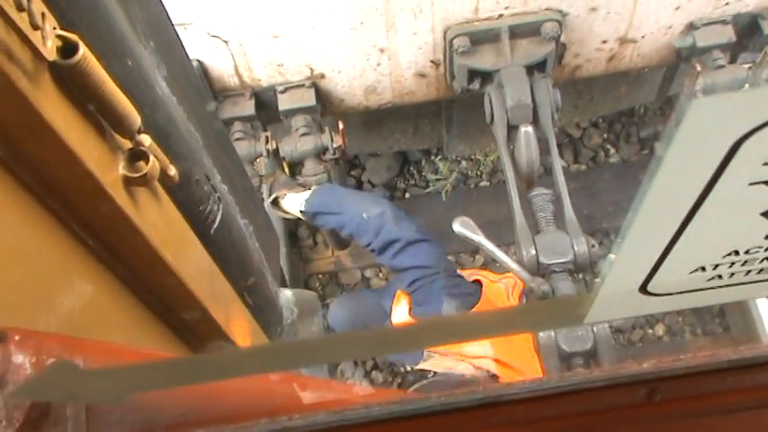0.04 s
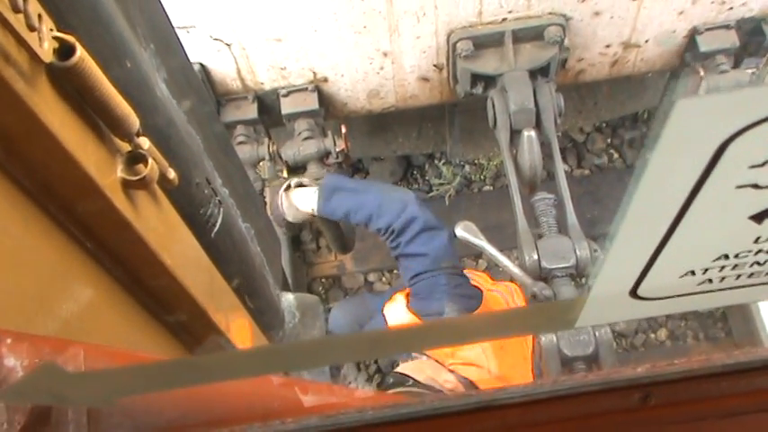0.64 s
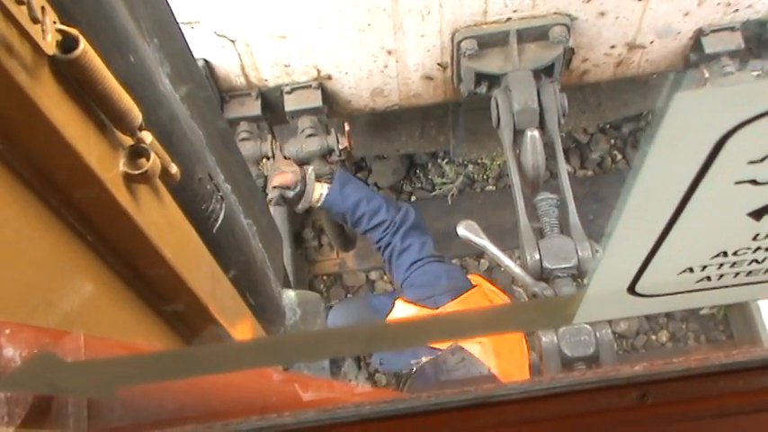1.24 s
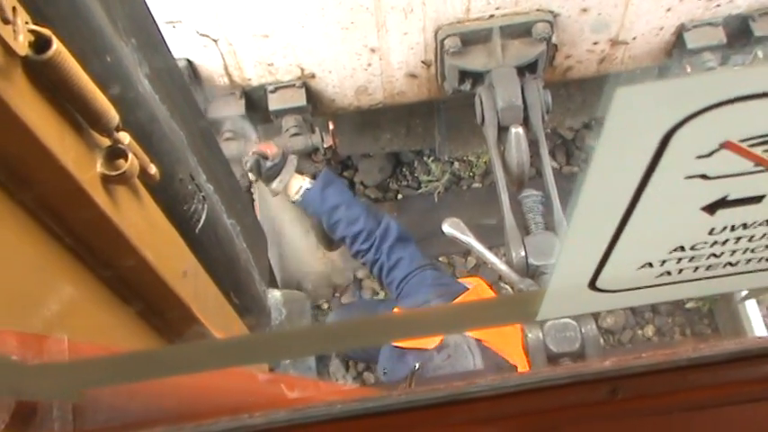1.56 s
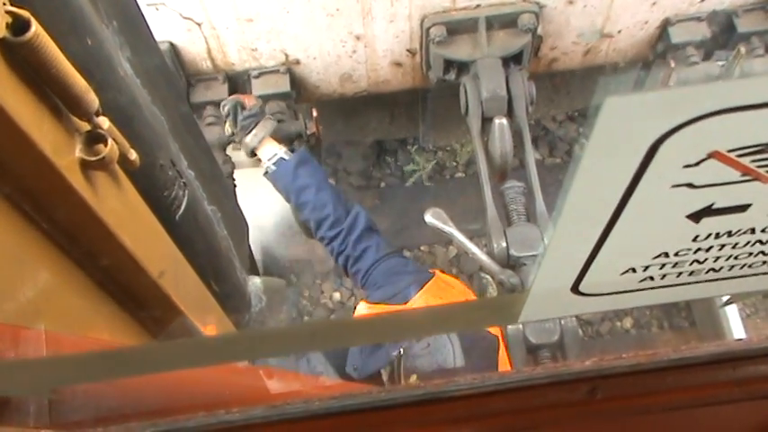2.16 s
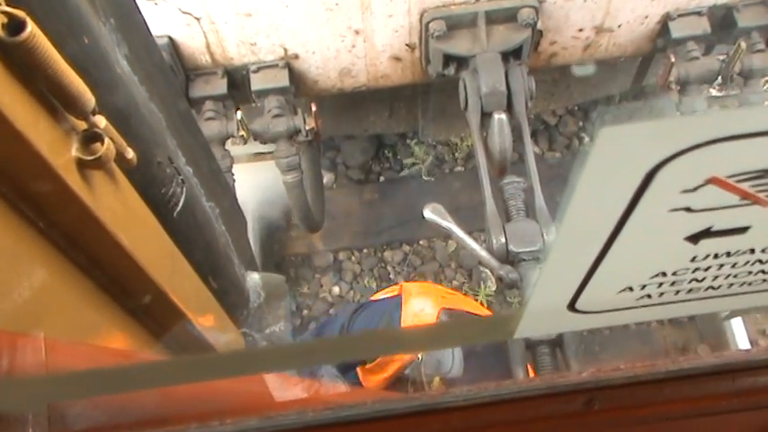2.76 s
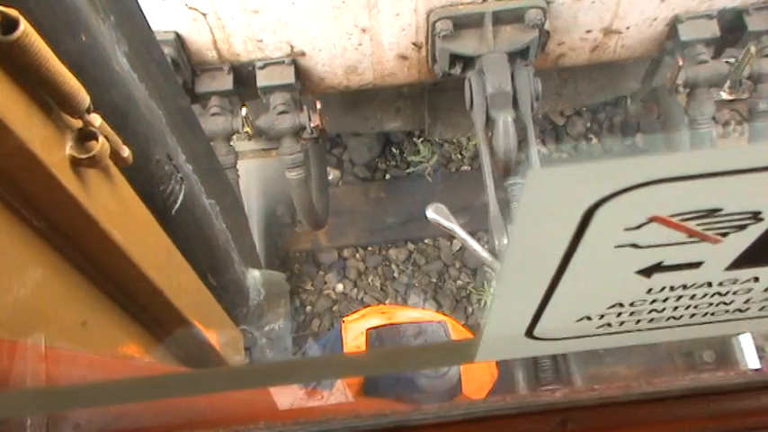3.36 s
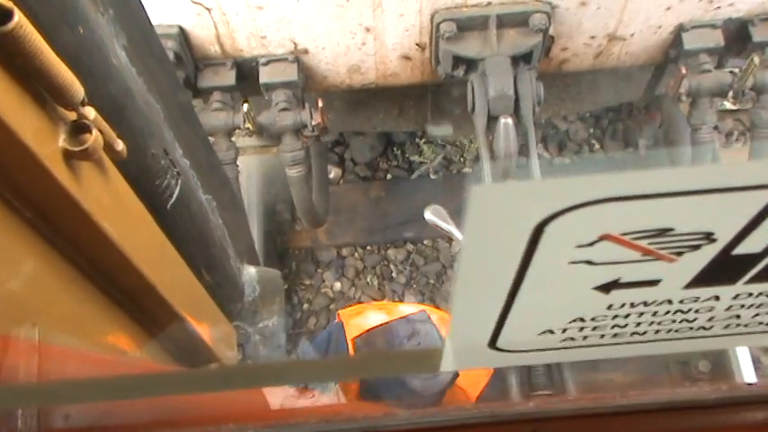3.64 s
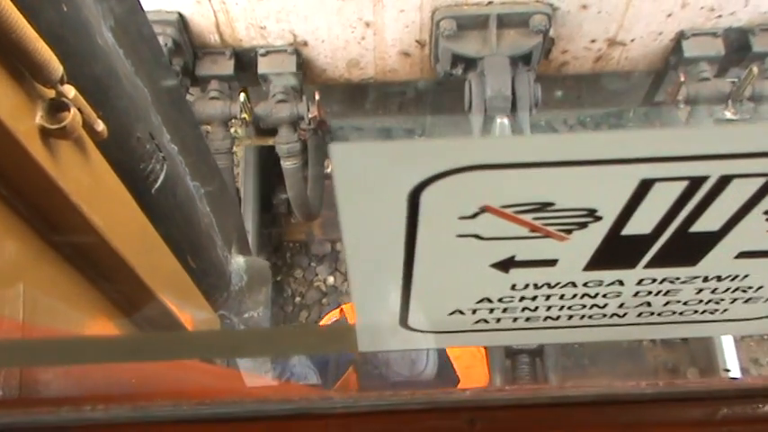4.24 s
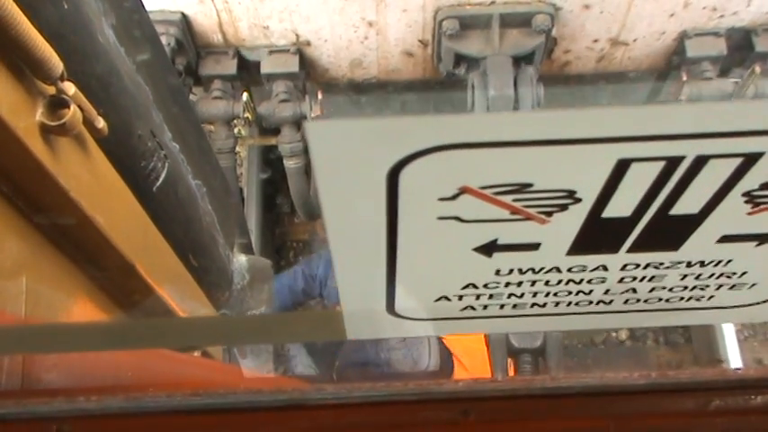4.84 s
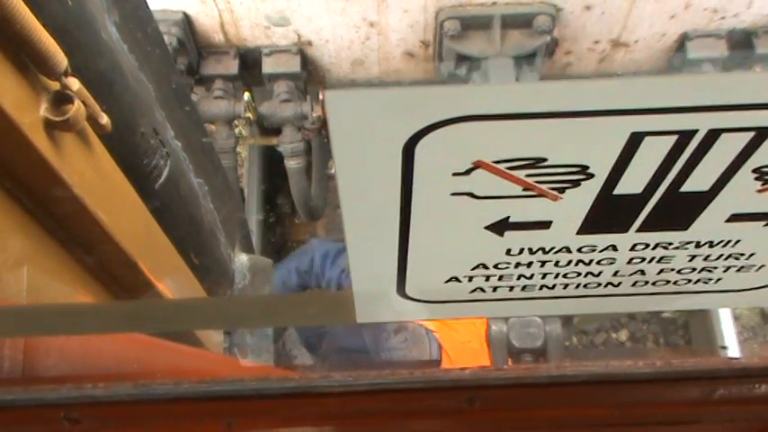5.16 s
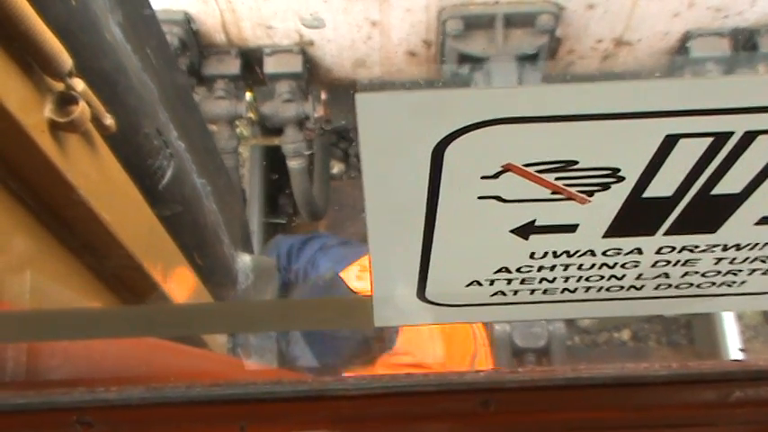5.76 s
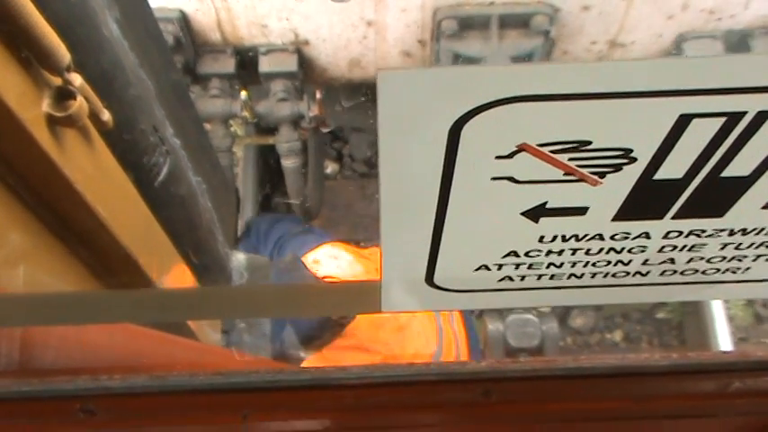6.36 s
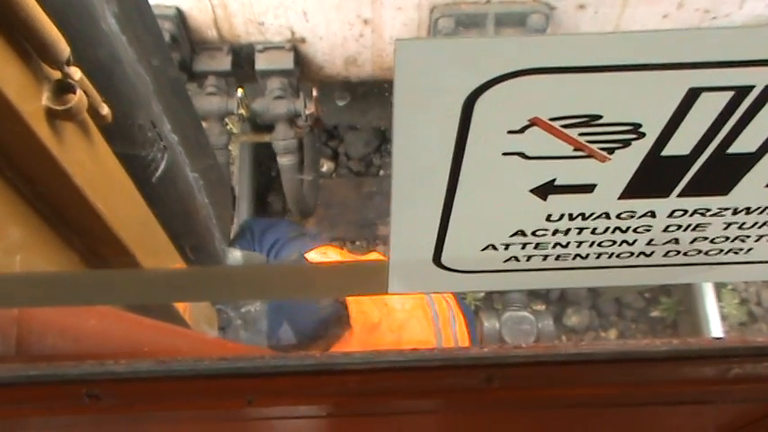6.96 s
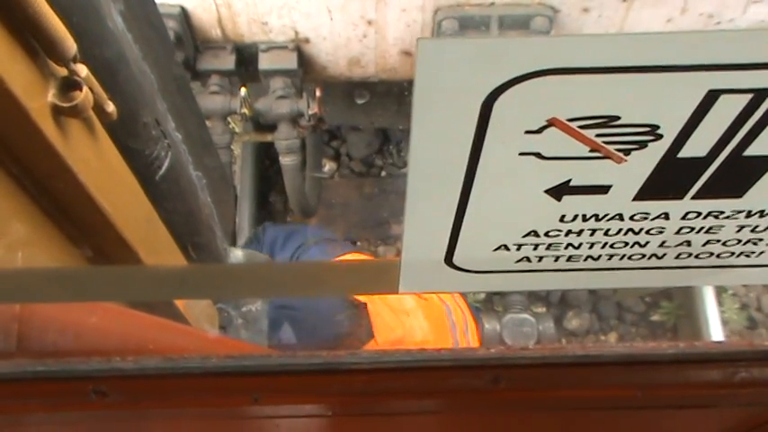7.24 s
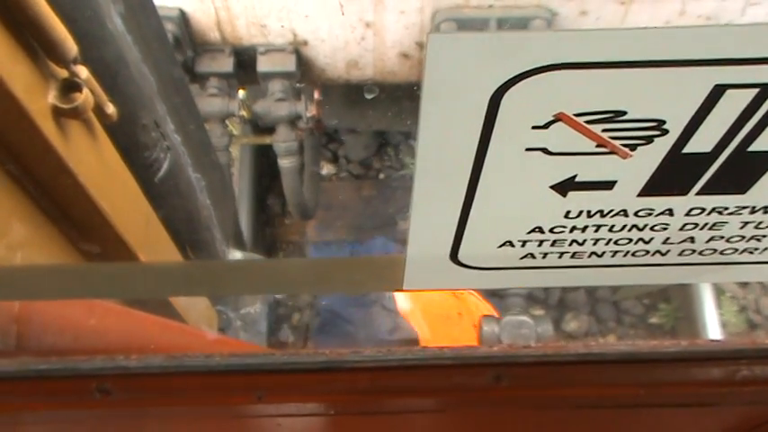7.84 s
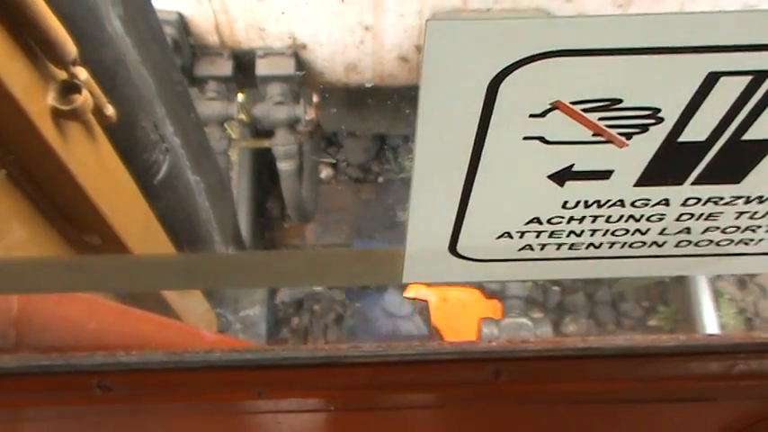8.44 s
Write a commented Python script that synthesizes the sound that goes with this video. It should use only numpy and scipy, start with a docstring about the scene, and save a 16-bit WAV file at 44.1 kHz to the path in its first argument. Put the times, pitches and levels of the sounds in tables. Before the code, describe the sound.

Compressed air spits from a train brake hose, then bursts into a loud hissing roar and dies away over an idling diesel locomotive.

```python
"""Air blasts from the brake pipe between a diesel locomotive and a wagon, heard from the cab above.
As a worker eases the cock open, the jet spits in short bursts, hisses, then roars at full bore until
the pipe is empty; the vehicles and the yard throw it back. The hose couplings wheeze faintly afterwards.
The diesel idles underneath throughout, ducked by gain control when the blast gets loud."""
import sys
import numpy as np
from scipy import signal
from scipy.fft import rfft, irfft, next_fast_len
from scipy.io import wavfile
from scipy.ndimage import uniform_filter1d

SR = 44100
rng = np.random.default_rng(int(sys.argv[2]) if len(sys.argv) > 2 else 0)


def store_pcm(level_fs):
    """Save levels as 16-bit WAV."""
    pcm = np.round(np.clip(level_fs, -1, 1) * 32767).astype(np.int16)
    wavfile.write(sys.argv[1], SR, np.atleast_2d(pcm).T)


N = 383229
TIME = np.arange(N) / SR

# engine automation: t/s, shaft speed/Hz, tone gain/dB, rumble gain/dB
ENGINE_IDLE = [(0, 12.23, -4.5, 4), (1.2, 12.28, 2.7, -2), (3, 12.3, -3.5, -3), (4.6, 12.3, 1.5, -1.3),
               (6.6, 12.24, 0.2, -0.3), (8.69, 12.22, 2.6, 0.1)]
# exhaust partials: multiple of shaft speed, level/dB
EXHAUST_TONES = [(3, -66), (6, -55.5), (12.5, -57), (13, -56.5), (14, -48), (19, -50.5), (20, -56.5),
                 (21, -47.5), (22, -41.5), (23, -40), (24, -43.5), (25, -48), (26, -50)]
# compressor partials: multiple of its own speed, level/dB
COMPRESSOR_TONES = [(2.5, -56.5), (3, -51), (3.5, -52.5), (4, -63), (4.5, -56), (5, -61), (9, -51.5),
                    (11, -48.5), (11.5, -54), (14, -58.5)]
# fan and gear whines: f/Hz, level/dB
FAN_TONES = [(353.5, -52.5), (409, -49), (437, -57), (472, -59)]
# EQ of the engine rumble: f/Hz, level/dB
RUMBLE_EQ = [(12, -88.5), (27, -64), (65, -73), (100, -64), (170, -62.5), (205, -64), (280, -57.5),
             (340, -66.5), (450, -69), (600, -78), (950, -80), (1250, -85.5), (2000, -85), (2700, -94),
             (4000, -102), (6000, -108.5), (9500, -109.5), (15000, -114)]
# the cock cracked open: t/s, length/s, final level/dB, swell on the way/dB, relative seep level/dB
COCK_SPURTS = [(-0.1, 0.12, -41.5, -4, -2), (0.181, 0.13, -26.5, 4.5, -9), (0.52, 0.22, -31, 0.5, -4),
               (0.86, 0.053, -25.5, 11, -2), (0.945, 0.55, -29.5, 2, -14.5)]
# EQ of the hiss at the hose lip: f/Hz, relative level/dB
HISS_EQ = [(150, -32.5), (600, -18), (1000, -15), (1700, -14.5), (2600, -10.5), (3800, -5), (5000, -3),
           (6200, -1), (8400, 0.5), (10000, -4.5), (12000, -11), (15500, -19)]
# ride on the hiss's top octave: t/s, gain/dB
HISS_FIZZ = [(0, -12), (0.25, 1), (1.3, -0.5), (1.7, 8), (1.92, 1.5), (2.25, -0.3), (2.6, 3.5), (4.05, 5.5),
             (4.25, -10)]
# modes of the hose and the gap between the vehicles: f/Hz, width/Hz, boost before scaling/dB
HOSE_MODES = [(351, 25, 10), (510, 28, 3.5), (643, 16, 3.8), (678, 8, 2.5), (758, 14, 6.8), (954, 16, 3.5),
              (1025, 36, 7), (1087, 16, 5), (1236, 24, 6.5), (1348, 20, 6), (1386, 35, 3.5), (1488, 32, 3),
              (1596, 16, 6.5), (1634, 24, 3.5), (1770, 40, 2.5), (2287, 18, 3), (2340, 55, 3),
              (2564, 36, 3.5), (2672, 45, 3.5), (2920, 70, 1.5), (3070, 60, 3), (3473, 24, 5.3),
              (3600, 78, 2.8), (6020, 160, 3.5), (6821, 150, 2), (7170, 60, 3)]
# EQ of the plume's roar: f/Hz, relative level/dB
ROAR_EQ = [(40, -37.5), (140, -23.5), (220, -13.5), (330, -11.5), (550, -5.5), (800, -3.5), (1100, -1),
           (1900, -0.5), (2600, -1.1), (3500, -1), (4300, -4), (6000, -22.5), (12000, -30)]
# the hose mouth half whistles as the flow passes its modes: t/s, half length/s, f/Hz, width/Hz, boost/dB
MOUTH_WHISTLES = [(1.62, 0.17, 6020, 168.3, 4), (1.837, .3, 2532, 45.55, 6), (1.744, 0.07, 998, 110.7, 3.5),
                  (2.242, 0.17, 2500, 264.7, 3.5), (2.303, 0.22, 3060, 122.5, 4.5),
                  (3.3, .15, 6830, 110, 6), (3.5, 0.46, 7300, 45, 6.5)]
# last air through narrow gaps in the couplings: centre t/s, half length/s, f/Hz, width/Hz, level/dB
GAP_WHEEZES = [(4.5, 0.25, 8800, 753, -95), (4.5, .2, 11640, 1208, -99.5), (4.812, 0.018, 4080, 150, -90),
               (5.98, .04, 5740, 330, -95.5), (6.13, 0.039, 5750, 330, -91),
               (6.36, 0.089, 5750, 321, -84.5), (7.22, .14, 7870, 1000, -101.5),
               (7.691, 0.041, 3890, 180, -85.5), (8.38, 0.038, 6500, 275, -99)]
# soft puffs from the hose: t/s, length/s, level/dB
HOSE_PUFFS = [(6.228, 0.16, -90.5), (7.356, 0.15, -83.5), (7.893, .01, -92), (8.045, .035, -97)]
# EQ of a puff: f/Hz, gain/dB
PUFF_EQ = [(500, 10), (1500, -3), (3000, -4), (4800, -4), (7000, -6.5), (9000, -16), (12000, -25),
           (15000, -32)]
# reverb time of the yard: f/Hz, t60/s
YARD_DECAY = [(200, 0.67), (1500, 0.98), (5000, 0.93), (7500, .73), (10000, 0.51), (12500, .42),
              (16000, 0.23)]
# stereo image at the two mic ports: f/Hz, coherence, left phase lead/rad, left minus right/dB
MIC_PORTS = [(30, 1, .33, 1), (70, .99, .6, 1), (130, .97, .95, 1.5), (280, .97, .96, 1),
             (600, .9, .8, 2.1), (1200, .91, .3, 1.4), (2500, .94, .05, -.3), (8000, .94, 0, -1),
             (12000, .7, .5, .5), (16000, .76, .1, .5)]
# as the blast ends the bass draws to the centre and the treble spreads: f/Hz, side gain/dB
SIDE_EQ = [(50, -23), (150, -15), (280, -10.5), (420, -8.5), (750, -2), (1500, 3), (5000, -0.5)]

OPEN_S, SAG_S, EMPTY_S = 1.501, 3.71, 4.062  # cues: the blast starts to open, pressure sags, air gives out
# blast envelopes: base level/dB, attack/s, attack exponent, growth/(dB/s), drop on the sag/dB
LIP = (-15.5, 0.36, 0.7, 1.1, 2)
PLUME = (-13, 0.3646, 1.93, 1.58, 12.5)


def gain_of(db):
    """Decibels to amplitude."""
    return np.exp(np.asarray(db) * (np.log(10) / 20))


def curve(rows, t):
    """Automation: the columns of a table at the times t."""
    times, *columns = np.transpose(rows)
    return [np.interp(t, times, c) for c in columns]


def colour(rows, hz):
    """EQ: the columns of a table on a log-frequency axis."""
    f, *columns = np.transpose(rows)
    return [np.interp(np.log(hz + 1), np.log(f + 1), c) for c in columns]


def bell(x, middle, width):
    """A smooth hump of height 1."""
    return np.exp(-((x - middle) / width) ** 2)


def ramp(t, start, length):
    """A linear fade from 0 to 1."""
    return np.clip((t - start) / length, 0, 1)


def grid(size):
    """Times (a column) and frequencies (a row) of short-time spectra."""
    return np.arange(4 * N // size + 5)[:, None] * size / 4 / SR, np.fft.rfftfreq(size, 1 / SR)


def wander(rate_hz, t=TIME):
    """A random LFO of rms 1 with swings up to rate_hz."""
    knots = np.linspace(0, N / SR, 2000)
    f = np.geomspace(rate_hz / 10, rate_hz, 20)[:, None]
    lfo = (np.sin(2 * np.pi * (f * knots + rng.random(f.shape))) / np.sqrt(f)).sum(0)
    return np.interp(t, knots, lfo / lfo.std())


def noise(field_db, size):
    """Partly coherent stereo noise, painted from a time-frequency field of dB per Hz."""
    t, hz = grid(size)
    a, b, c, d = rng.standard_normal((4, len(t), len(hz)))
    coherence = np.clip(colour(MIC_PORTS, hz)[0], 0, 1)
    left = a + 1j * b
    right = coherence * left + np.sqrt(1 - coherence ** 2) * (c + 1j * d)
    spectra = np.array([left, right]) * gain_of(field_db)
    x = signal.istft(spectra, nperseg=size, noverlap=size * 3 // 4, time_axis=1, freq_axis=2)[1]
    return x[:, :N] * np.sqrt(1.5 * SR / size)


def unit_power(db, hz):
    """Trims a spectrum to a total power of 0 dB."""
    return db - 10 * np.log10((gain_of(db) ** 2).sum() * hz[1])


def eddies(t, hz, depth_db, frames=5, bins=40):
    """Turbulent grain: brief patches of more and less energy."""
    grain = rng.standard_normal((len(t), len(hz)))
    patches = uniform_filter1d(uniform_filter1d(grain, frames, 0), bins, 1)
    return depth_db * patches / patches.std()


def tone(turns, db, waver_db):
    """One machine partial with a wavering level."""
    waver = wander(12, np.linspace(0, N / SR, len(turns)))
    return np.sqrt(2) * gain_of(db + waver_db * waver) * np.sin(2 * np.pi * turns)


def diesel_idle():
    """The bed: exhaust, compressor and fan tones over a rumble that throbs with the shaft."""
    speed_hz, tones_db, rumble_db = curve(ENGINE_IDLE, TIME)
    turns = np.cumsum(speed_hz * (1 + .002 * wander(2))) / SR
    step = 32  # low tones need few samples
    shaft = turns[::step]
    compressor = .927 * shaft  # throbs a little slower
    # cylinders that differ fill the free half multiples with weak tones
    uneven = np.setdiff1d(np.arange(5.5, 29, .5), [k for k, _ in EXHAUST_TONES])
    orders = list(EXHAUST_TONES) + [(k, -66) for k in uneven]
    # phase offsets in k squared: the silencer smears each pulse
    tones = sum(tone(k * shaft + .13 * k ** 2, db, waver_db=1.9) for k, db in orders)
    tones += sum(tone(k * compressor + .33 * k ** 2, db, waver_db=-1.1) for k, db in COMPRESSOR_TONES)
    tones += sum(tone(f * shaft / speed_hz.mean(), db, waver_db=2.2) for f, db in FAN_TONES)
    tones = signal.resample_poly(tones, step, 1)[:N]
    t, hz = grid(size=4096)
    throb = 1 + 0.05 * np.cos(2 * np.pi * turns) + 0.071 * np.cos(2 * np.pi * 2 * turns)
    rumble = noise(colour(RUMBLE_EQ, hz)[0] + eddies(t, hz, depth_db=0.14), size=4096) * throb
    return tones * gain_of(tones_db) + rumble * gain_of(rumble_db)


def spurt_envelope():
    """The cock is only cracked open: each spurt snaps on, swells, shuts fast and seeps a little longer."""
    snap_s, close_s, seep_s = 0.011, 0.021, 0.09
    power = np.zeros(N)
    for start, length, db, swell_db, seep_db in COCK_SPURTS:
        swell = gain_of(db + swell_db * (ramp(TIME, start, length) - 1))
        after = np.maximum(TIME - start - length, 0)
        release = np.maximum(np.exp(-after / close_s), gain_of(seep_db) * np.exp(-after / seep_s))
        power += (ramp(TIME, start, snap_s) * swell * release) ** 2
    return np.sqrt(power)


def pressure_ride(t, layer):
    """Fader ride in dB: a jet layer grows during the blast and drops as the pressure sags."""
    *_, growth_db_per_s, drop_db = layer
    return growth_db_per_s * (np.clip(t, OPEN_S, SAG_S) - OPEN_S) - drop_db * ramp(t, SAG_S, 0.1855)


def blast_envelope(layer, release_db_per_s=164.5):
    """Amplitude of a jet layer from the turn of the handle until the pipe is empty."""
    db, attack_s, exponent, _, _ = layer
    attack = ramp(TIME, OPEN_S, attack_s) ** exponent
    emptying_db = release_db_per_s * np.maximum(TIME - EMPTY_S, 0)
    return attack * gain_of(db + pressure_ride(TIME, layer) - emptying_db)


def air_jet():
    """Bright hiss from the lip and full-bodied roar from the plume share resonances and flutter."""
    t, hz = grid(size=4096)
    ring_db = sum(db / (1 + (2 * (hz - f) / width) ** 2) for f, width, db in HOSE_MODES)
    whistle_db = sum(db * bell(t, middle, half) * bell(hz, f, width)
                     for middle, half, f, width, db in MOUTH_WHISTLES)
    # shock cells shorten through the blast, so their band of hiss climbs, swells and fades
    shock_hz = 4300 + 1400 * (t - OPEN_S)
    shock_db = 5.5 * bell(t, middle=1.69, width=2.6) * (t > OPEN_S) * bell(hz, shock_hz, width=1600)
    fizz_db = curve(HISS_FIZZ, t)[0] * ramp(hz, 8500, 4500)
    hiss_db = unit_power(colour(HISS_EQ, hz)[0] + .9 * ring_db, hz) + whistle_db + shock_db + fizz_db
    hiss_db += eddies(t, hz, depth_db=2.04, frames=9, bins=14)
    hiss = noise(hiss_db, size=4096) * np.hypot(spurt_envelope(), blast_envelope(LIP))
    # a low shelf holds the plume's bass steady while the rest grows and sags
    boom_db = (2.5 - pressure_ride(t, PLUME)) / (1 + (hz / 1150) ** 4)
    roar_db = unit_power(colour(ROAR_EQ, hz)[0] + 1.35 * ring_db, hz) + whistle_db + boom_db
    roar = noise(roar_db + eddies(t, hz, depth_db=0.03), size=4096) * blast_envelope(PLUME)
    return (hiss + roar) * gain_of(0.28 * wander(60))


def coupling_leaks():
    """The last air escapes in narrow wheezes, one breathy squeak and broad puffs."""
    t, hz = grid(size=512)
    power = sum(gain_of(db) ** 2 / (1 + ((t - middle) / half) ** 6) * bell(hz, f, width)
                for middle, half, f, width, db in GAP_WHEEZES)
    # the squeak's pitch and level arch with the flow
    arch = np.sin(np.pi * ramp(t, start=6.235, length=.225))
    power += gain_of(-93) ** 2 * abs(arch) * bell(hz, 7240 + 750 * arch, width=200)
    puffs = 0
    for start, length, db in HOSE_PUFFS:
        release = np.exp(-np.maximum(t - start - length, 0) / (0.74 * length))
        puffs += gain_of(db) * ramp(t, start, 0.54 * length) * release
    power += (puffs * gain_of(colour(PUFF_EQ, hz)[0])) ** 2
    return noise(10 * np.log10(power + 1e-18), size=512) * gain_of(0.89 * wander(50))


def yard_echoes(x, near_db, far_db, reflections=60):
    """Close steel walls comb the sound; the yard adds a tail that loses its treble first."""
    near = np.zeros((2, SR))
    delays_s = rng.uniform(.003, .04, reflections)
    near[:, (delays_s * SR).astype(int)] = rng.choice([-1, 1], reflections) * np.exp(-delays_s / .025)
    taps = rng.standard_normal((2, SR)) * (rng.random((2, SR)) < .06)
    taps *= np.arange(SR) > .015 * SR  # pre-delay
    hz, t, spectra = signal.stft(taps, SR, nperseg=256)
    decay = gain_of(-60 * t / colour(YARD_DECAY, hz)[0][:, None])
    far = signal.istft(spectra * decay, SR, nperseg=256)[1][:, :SR]
    near *= gain_of(near_db) / np.linalg.norm(near[0])
    far *= gain_of(far_db) / np.linalg.norm(far[0])
    return signal.fftconvolve(x, near + far, axes=1)[:, :N]


def scene():
    """The mix: air and its echoes over the engine bed, the small leaks drier than the jet."""
    jet, leaks = air_jet(), coupling_leaks()
    send = jet + gain_of(-2.5) * leaks
    return jet + leaks + yard_echoes(send, near_db=-12.5, far_db=-11.0) + diesel_idle()


def gain_control(x, limit_db, recovery_db_per_s):
    """Ducks the whole mix quickly above the limit, then creeps back up."""
    power_db = 10 * np.log10(abs(uniform_filter1d((x ** 2).mean(0), size=3000)) + 1e-12)
    recovery_db = recovery_db_per_s * TIME
    held_db = np.maximum.accumulate(power_db + recovery_db) - recovery_db
    return x * gain_of(-np.maximum(held_db - limit_db, 0))


def record(dry):
    """Master chain: the mic ports skew phase and balance, side EQ fades in, then ducking and a high cut."""
    size = next_fast_len(N + SR)
    hz = np.fft.rfftfreq(size, 1 / SR)
    _, lead, balance_db = colour(MIC_PORTS, hz)
    skew = np.exp(.5j * lead) * gain_of(balance_db / 2)
    ports = rfft(dry, size) * np.array([skew, 1 / skew])
    side = (ports[0] - ports[1]) / 2
    side_change = irfft(side * (gain_of(colour(SIDE_EQ, hz)[0]) - 1), size)[:N]
    side_change *= ramp(TIME, start=3.8, length=0.6)
    stereo = irfft(ports, size)[:, :N] + np.array([side_change, -side_change])
    ducked = gain_control(stereo, limit_db=-16.0, recovery_db_per_s=0.6)
    high_cut = signal.firwin(1023, cutoff=15800, window=("kaiser", 9), fs=SR)
    return signal.oaconvolve(ducked, high_cut[None], "same")


dry = scene()
out = record(dry)
store_pcm(out)
```